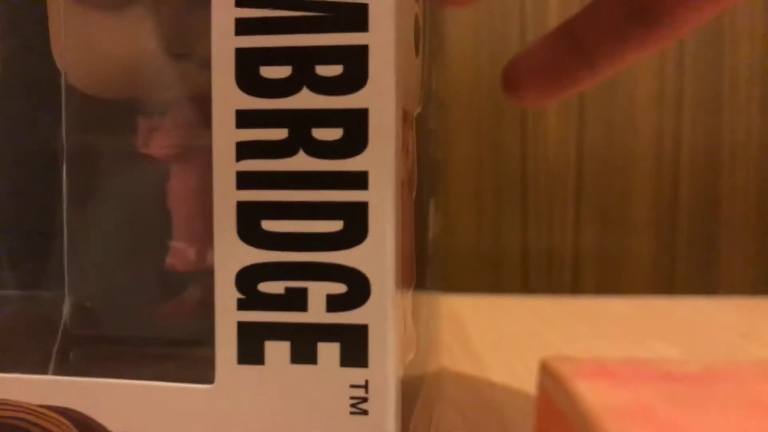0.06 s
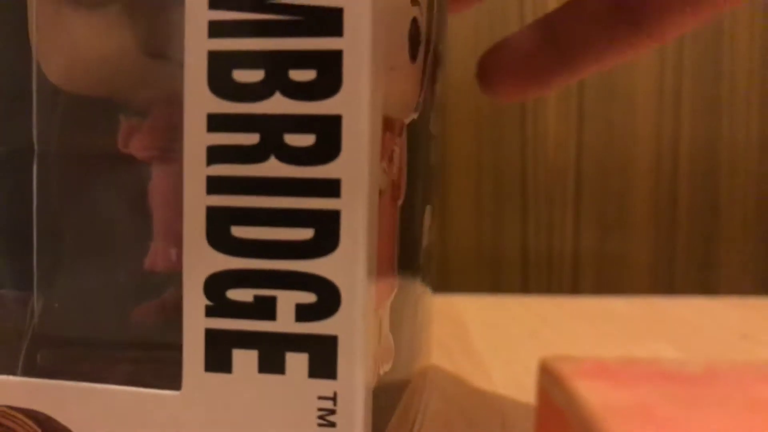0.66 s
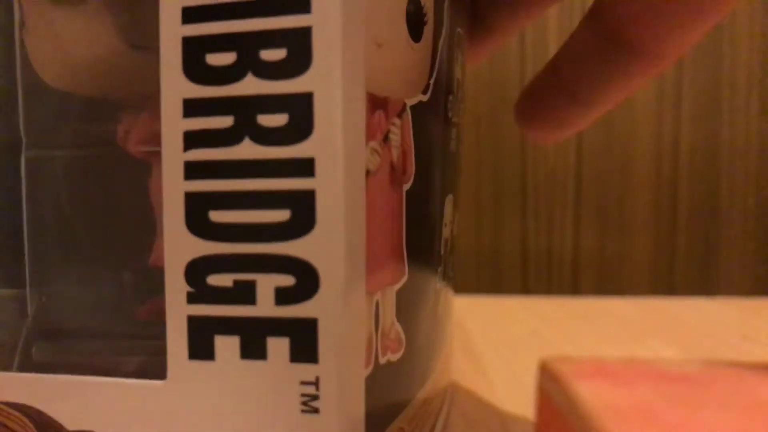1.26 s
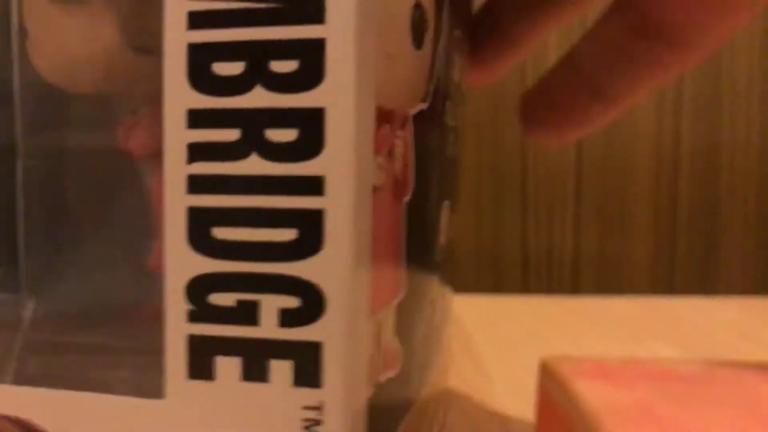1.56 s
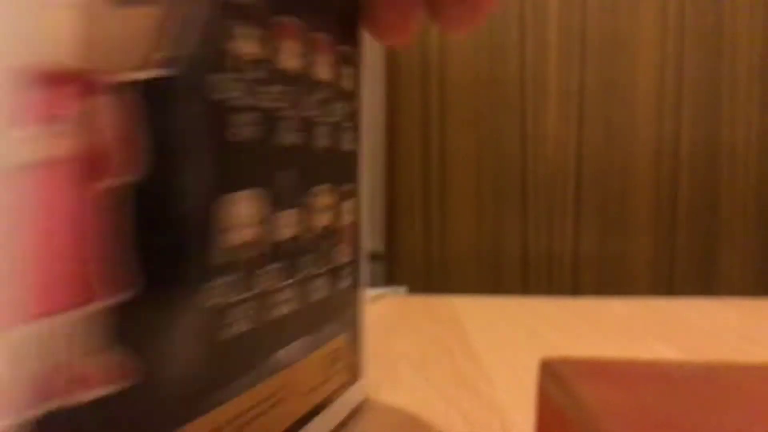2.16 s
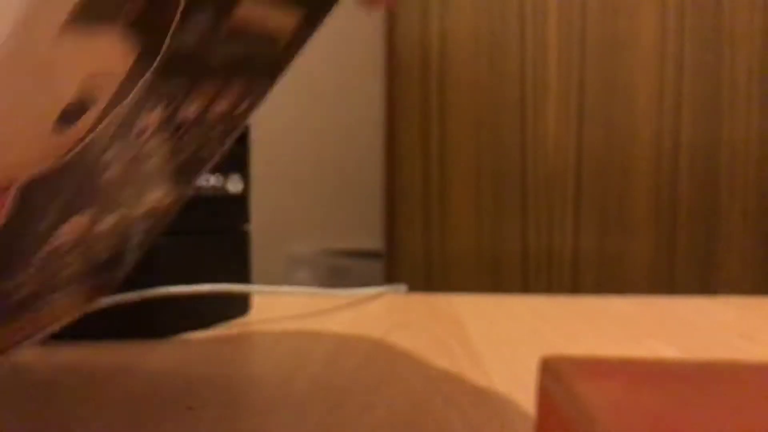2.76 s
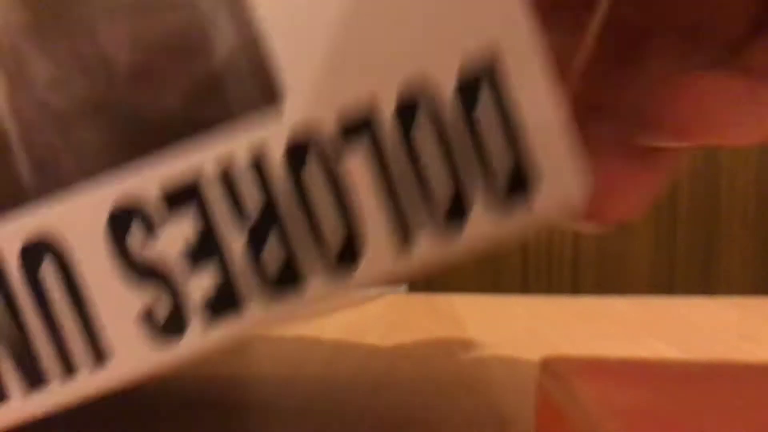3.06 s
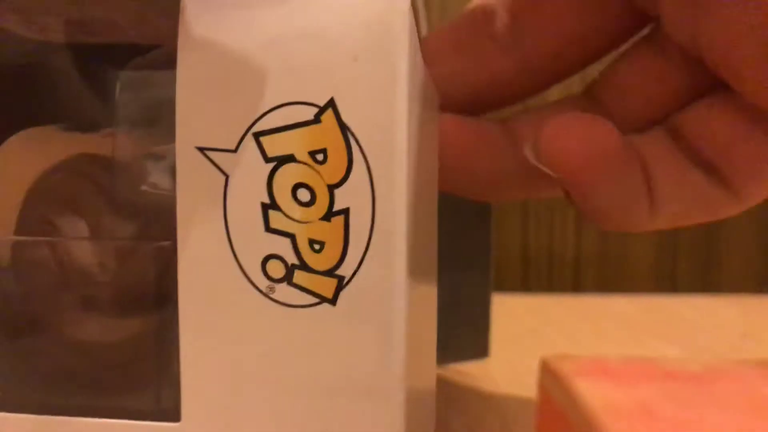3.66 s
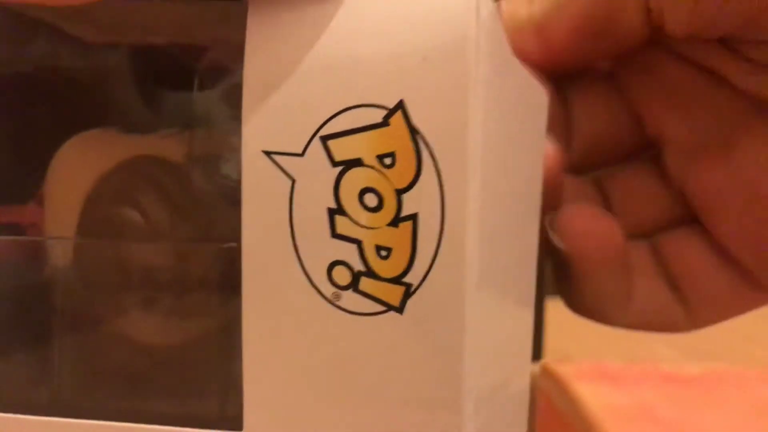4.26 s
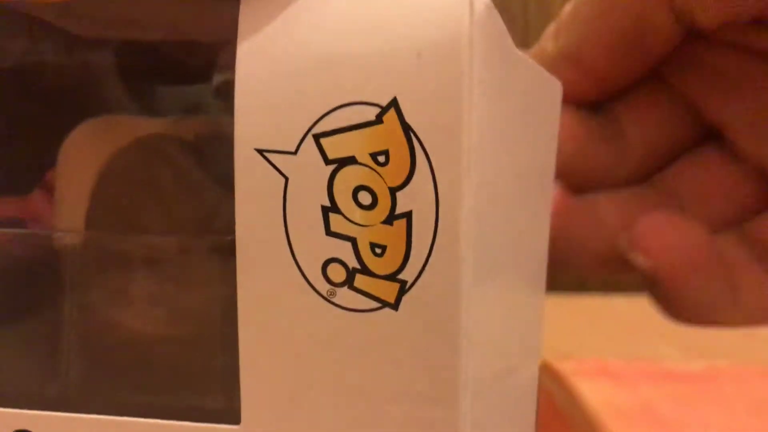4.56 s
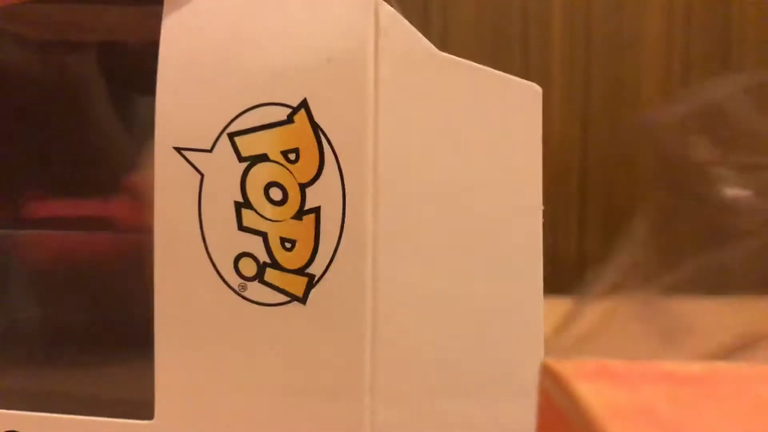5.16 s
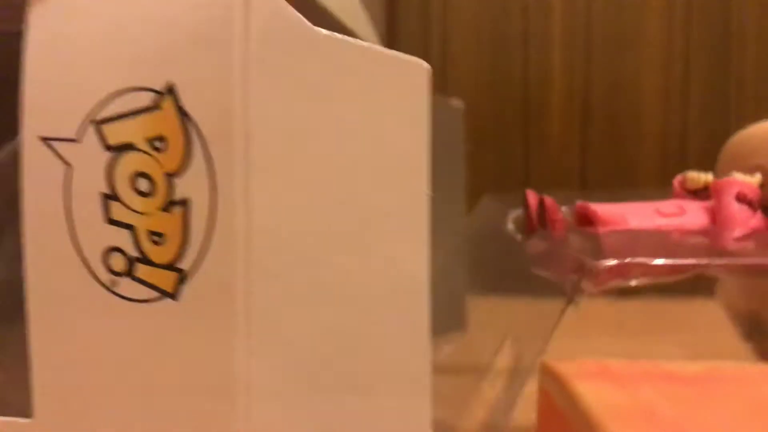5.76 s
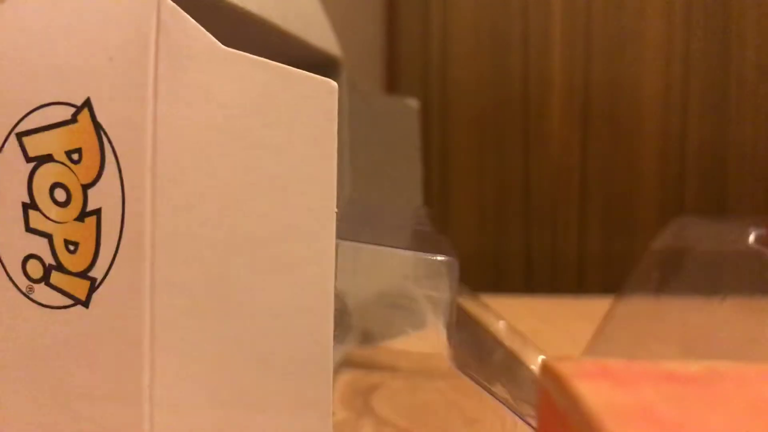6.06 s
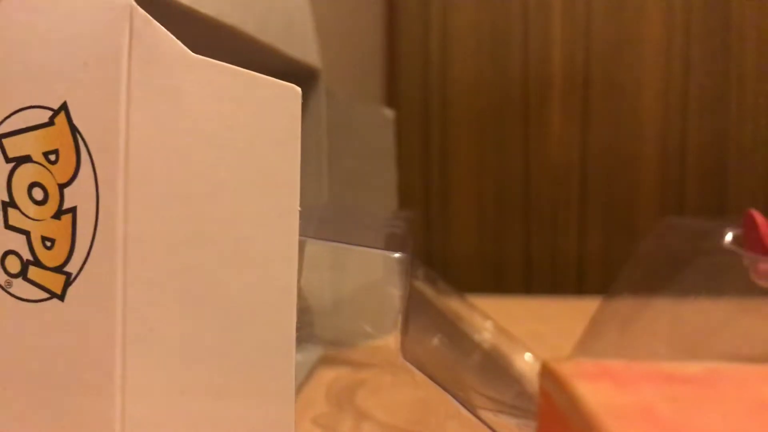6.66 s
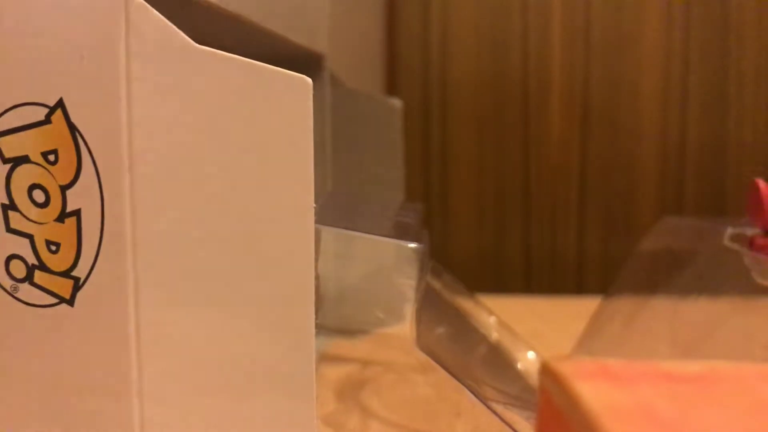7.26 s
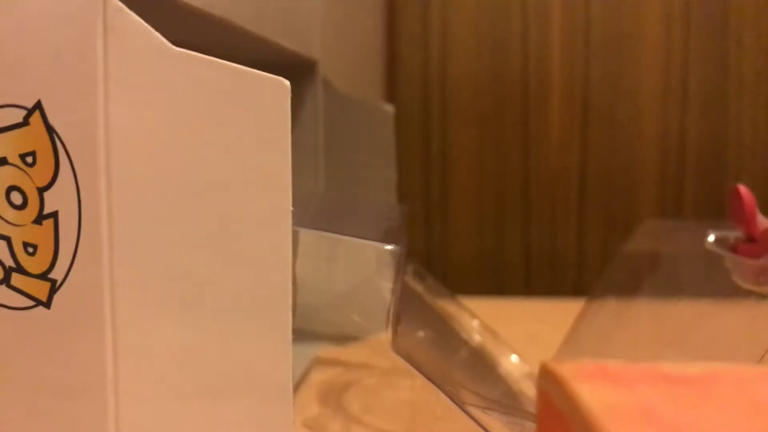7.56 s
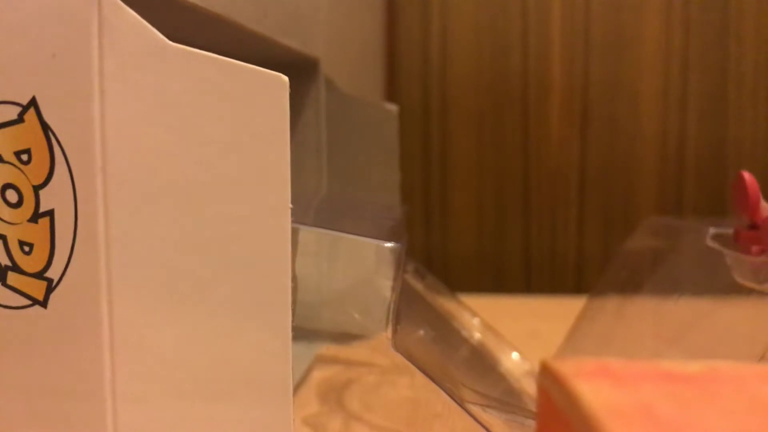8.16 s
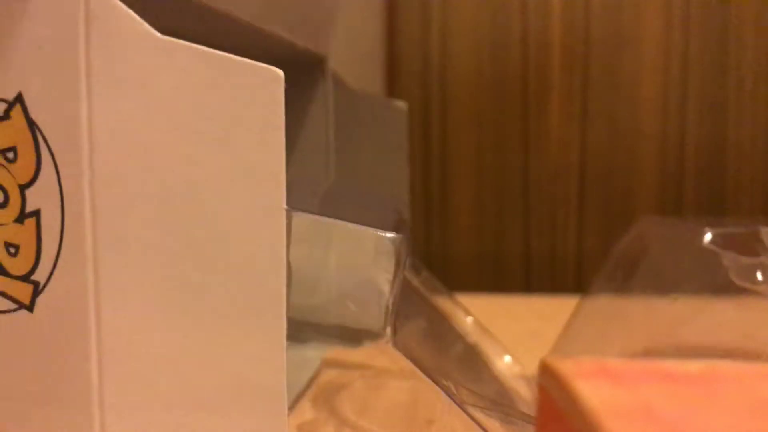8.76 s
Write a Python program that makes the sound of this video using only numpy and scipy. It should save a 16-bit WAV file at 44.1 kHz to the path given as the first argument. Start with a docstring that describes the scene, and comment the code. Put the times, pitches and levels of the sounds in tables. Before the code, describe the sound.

Hands turn and open a thin cardboard toy box and slide out a plastic tray, with hollow knocks, scrapes and crinkles.

```python
"""In a small, quiet room, close to the microphone, hands turn a thin cardboard toy box, pry its flap open
and slide the plastic tray out onto a desk. Knocks, taps and snaps make the box panels ring. Fingers,
flap and tray rub in short strokes, sticking and slipping in tiny grains that shake the same panels.
Now and then the plastic crinkles or pops, flap and tray squeak, and a squeezed wall booms."""
import sys
import numpy as np
from scipy import signal
from scipy.fft import rfft, irfft
from scipy.io import wavfile
from scipy.ndimage import uniform_filter1d, map_coordinates

SR = 44100
rng = np.random.default_rng(int(sys.argv[2]) if len(sys.argv) > 2 else 0)


def pcm_store(signal):
    """Save signal as 16-bit PCM."""
    levels = np.round(np.clip(np.atleast_2d(signal), -1, 1) * 32767)
    wavfile.write(sys.argv[1], SR, levels.astype(np.int16).T)


N = 397341
TOP_HZ = 15900


# knocks and snaps of box, flap and tray: (time [s], contact time [s], panel pitch [Hz],
# thump level [dB], panel level [dB], crack level [dB], tick level [dB])
KNOCKS = [(0.305, 0.0047, 349, -34, -34.5, -41, -49), (0.642, 0.002, 760, -48.5, -40.5, -36, -42.5),
          (1.261, 0.0035, 718, -31.5, -19, -24, -31), (1.415, 0.0015, 434, -35.5, -24.5, -35, -38),
          (1.436, 0.0048, 460, -31, -21, -38, -37.5), (1.865, 0.0041, 506, -24, -24, -24, -34.5),
          (2.886, 0.0047, 424, -25, -33.5, -44.5, -53), (3.549, 0.0051, 1150, -46, -36, -35.5, -51),
          (3.899, 0.00387, 1615, -46, -39, -32.5, -37.5), (4.4, 0.0013, 470, -44.5, -24, -28.5, -31.5),
          (4.577, 0.00504, 540, -72, -26, -35, -42.5), (4.8345, 0.0014, 1370, -33.5, -25.5, -31, -33),
          (4.851, 0.0083, 1380, -46, -27.5, -22, -29.5), (4.862, 0.013, 1540, -24.5, -26, -26, -24.5),
          (4.927, 0.005, 527, -24.5, -31.5, -37, -40.5), (4.967, 0.012, 507, -35.5, -20.5, -32, -37.5),
          (5.137, 0.0071, 550, -27, -31, -32.5, -47), (5.68, 0.0028, 2940, -66, -39.5, -34.5, -43),
          (5.776, 0.0079, 440, -33.5, -37, -38.5, -51.5), (5.883, 0.009, 354, -31, -26.5, -35, -43.5),
          (6.426, 0.0024, 412, -40.5, -37.5, -44, -69), (6.553, 0.0092, 390, -37, -43, -47, -49.5),
          (7.859, 0.0046, 1570, -47, -43, -33.5, -43)]

def knocks():
    """Box, flap and tray bump and snap, each time with its own tone."""
    return place((start, blow(contact_s, ring_hz, levels_db, dense_db=17))
                 for start, contact_s, ring_hz, *levels_db in KNOCKS)


# pitch ranges of thump, panel, crack and tick: (low edge [Hz], high edge [Hz])
BANDS = [(52, 250), (250, 900), (900, 3000), (3000, 16000)]

def blow(contact_s, ring_hz, levels_db, dense_db, slip_db=7, ring_db=5):
    """A touch and eight small slips ring the struck panel, the box and a dense mass of short tones."""
    t = np.arange(SR // 5) / SR
    when = (np.arange(8) + rng.random(8)) / 8
    size = np.tanh(rng.standard_normal(8))
    force = np.zeros(len(t))
    np.add.at(force, (when * contact_s * SR).astype(int), undb(slip_db) * size * np.cos(when))
    force[0] += 1
    panel = undb(ring_db) * np.sin(2 * np.pi * ring_hz * t) * fade(t, ring_time(ring_hz))
    ring = signal.fftconvolve(force, box_ring(t) + panel)[:len(t)]
    # a sharp snap keeps more treble than a soft bump
    corner_hz = np.clip(13000 * undb(1.14 * (levels_db[-1] - levels_db[-2])), 2500, TOP_HZ)
    out = 0
    for (lo, hi), db, t60 in zip(BANDS, levels_db, np.geomspace(0.057, 0.0048, len(BANDS))):
        decay = fade(t, t60) + undb(-19) * fade(t, t60=0.22)  # the tray inside shivers on longer
        power = signal.fftconvolve(force ** 2, decay ** 2)[:len(t)]
        power = np.abs(soften(power, hz=85))  # card gives way, so the blow takes a moment to build
        dense = undb(dense_db) * np.sqrt(power) * rng.standard_normal(len(t))
        part = band(soften(soften(ring + dense, corner_hz), corner_hz), lo, hi)
        first_30ms = part[:int(.03 * SR)]
        out = out + undb(db) * part / np.sqrt(np.mean(first_30ms ** 2))
    return out


# the box's natural tones: (pitch [Hz], level [dB])
BOX_TONES = [(112, -3), (175, -2), (255, -9), (390, 3.5), (522, 8.5), (590, -1.5), (860, -4.5), (1125, 0),
             (1430, 5), (1640, 6)]

def box_ring(t, scatter_db=3.5):
    """The box rings with a different mix of its tones wherever it is touched."""
    hz, db = np.transpose(BOX_TONES)[:, :, None]
    weight, detune, side = rng.standard_normal((3, len(BOX_TONES), 1))
    waves = np.sign(side) * np.sin(2 * np.pi * hz * (1 + 0.033 * detune) * t)
    return np.sum(undb(db + scatter_db * weight) * fade(t, ring_time(hz)) * waves, axis=0)


def ring_time(hz):
    """Seconds a tone takes to fall 60 dB; in card, high tones die sooner."""
    return 0.05 * (hz / 500) ** -0.52


# fingers tapping the card: (time [s], level [dB])
TAPS = [(0.001, -39.5), (0.08, -58), (0.134, -55.5), (0.24, -61), (0.459, -53), (1.131, -39),
        (1.514, -43.5), (1.81, -38.5), (1.824, -40), (1.967, -42.5), (2.235, -39), (2.323, -49),
        (2.408, -40.5), (2.59, -44), (3.234, -44.5), (5.557, -37), (7.483, -48), (7.508, -45.5),
        (8.087, -51.5), (8.207, -54.5), (8.785, -49.5)]

def taps():
    """Soft finger pads land with a hollow bump."""
    return light_blows(TAPS, contact_s=.008, ring_hz=516, bands_db=(-3.5, 2.5, -11.5, -18.5), dense_db=10)


# a nail picking at the card: (time [s], level [dB])
PICKS = [(3.445, -41), (3.619, -43), (3.689, -42), (3.731, -41), (3.787, -45), (3.82, -37), (6.007, -34),
         (7.598, -41)]

def nail_picks():
    """A fingernail catches the card's edge with a click."""
    return light_blows(PICKS, contact_s=.005, ring_hz=1155, bands_db=(-10, 0, -5.5, -19), dense_db=11.5)


# crinkles of the plastic: (time [s], level [dB])
CRINKLES = [(1.009, -55.5), (1.403, -46), (1.437, -31), (1.729, -56), (2.128, -56), (2.237, -53),
            (2.249, -51.5), (2.409, -47.5), (2.502, -58), (2.729, -63), (3.977, -52), (4.06, -52.5),
            (4.292, -45), (4.381, -46), (4.566, -56), (4.676, -54.5), (4.753, -54), (5.311, -49),
            (6.496, -53.5), (6.829, -62), (7.032, -62), (7.152, -52), (7.682, -65.5), (7.909, -52)]

def crinkles():
    """The plastic window and tray give light, bright crackles."""
    return light_blows(CRINKLES, contact_s=.002, ring_hz=510.5, bands_db=(-9, 7, 5, 0), dense_db=16.5)


# pops of the plastic: (time [s], level [dB])
POPS = [(4.522, -32), (5.19, -23.5), (6.485, -42), (6.548, -41), (7.084, -48.5), (7.878, -38)]

def pops():
    """Stiff plastic pops over and rings."""
    return light_blows(POPS, contact_s=.0025, ring_hz=1561, bands_db=(-37, -22.5, -2.5, -17), dense_db=7)


def light_blows(table, contact_s, ring_hz, bands_db, dense_db):
    """Blows of one kind; bands_db is added to each level for thump, panel, crack and tick."""
    return place((start, blow(contact_s, ring_hz, db + np.array(bands_db), dense_db))
                 for start, db in table)


# tone colour of rubbed card: (frequency [Hz], level [dB])
CARD_COLOUR = [(40, -34.5), (65, 6.5), (280, -1), (460, 7), (720, -3), (1400, -6), (3400, -18), (6000, -22),
               (10000, -19), (15500, -40)]

def rubbing():
    """Rubbing bends the box, rings its panels and hisses at the cut edges; a firm slide is brighter."""
    power = pad_rubs() + window_glides() + flap_scrapes() + tray_tugs() + desk_shifts() + grip_creep()
    scrape_db, rasp_db, hiss_db, rumble_db = 10 * np.log10(power)
    friction = colour(slips(scrape_db), CARD_COLOUR)
    ringing = 0
    for hz, db in BOX_TONES:
        resonance = signal.iirpeak(hz, Q=hz * ring_time(hz) * np.pi / np.log(1000), fs=SR)
        grip_db = 4.5 * wander(18)  # the shifting grip frees one tone and muffles another
        ringing = ringing + undb(db + grip_db) * signal.lfilter(*resonance, friction)
    ringing = waver(ringing, depth=.06, rate=14)  # pressure stiffens and slackens the panels
    card = unit(friction) + unit(ringing)
    sizzle = undb(-6 + 0.26 * (hiss_db + 34)) * unit(band(card, 7500, TOP_HZ))
    rumble = undb(rumble_db + 2 * wander(11)) * unit(band(card, *BANDS[0]))
    scrape = undb(scrape_db + 1.5) * unit(band(card, *BANDS[1]))
    rasp = undb(rasp_db) * unit(band(card, 945, 3260))
    hiss = undb(hiss_db) * (unit(band(card, 2400, 6370)) + sizzle)
    return rumble + scrape + rasp + hiss


def slips(scrape_db, rate=1000, steady=0.81, uneven_db=2.3):
    """Surfaces stick and slip in tiny bursts of noise, more often in a firm slide."""
    chance = rate * undb(0.34 * (scrape_db + 42)) / SR
    power = grains(chance, spread_db=3.5, t60=0.02, samples=SR // 20, weight=1 / chance)
    noise = np.sqrt(power / power.mean() + steady) * rng.standard_normal(N)
    return unit(noise * undb(uneven_db * wander(45)))


# strokes of the flap: (start [s], length [s], level [dB])
FLAP_SCRAPES = [(1.365, 0.09, -43), (3.832, 0.07, -41.5), (3.85, 0.011, -28), (4.112, 0.065, -37),
                (4.2, 0.28, -47.5), (4.33, 0.15, -38.5), (4.563, 0.073, -51.5), (4.845, 0.066, -35)]

def flap_scrapes():
    """Power of the flap's cut edge scraping brightly in its slot."""
    return rub_bands(strokes(FLAP_SCRAPES), rasp_db=0, hiss_db=-3.5, rumble_db=-13)


# pulls on the tray: (start [s], length [s], level [dB])
TRAY_TUGS = [(4.97, 0.37, -41.5), (5.09, 0.048, -34.5), (5.24, 0.27, -44.5), (5.68, 0.077, -47),
             (5.76, 0.24, -44.5), (5.84, 0.03, -36.5), (5.965, 0.051, -36)]

def tray_tugs():
    """Power of the tray dragging out of the box."""
    return rub_bands(strokes(TRAY_TUGS), rasp_db=-2, hiss_db=-11, rumble_db=-3)


# finger strokes on the card: (start [s], length [s], level [dB])
PAD_RUBS = [(1.03, 0.44, -48), (1.45, 0.093, -43.5), (1.865, 0.041, -35.5), (2.885, 0.06, -37.5),
            (3.55, 0.097, -45.5), (6.553, 0.026, -43.5), (7.46, 0.073, -42), (7.58, 0.048, -44.5),
            (7.812, 0.12, -50.5)]

def pad_rubs():
    """Power of finger pads easing into a dull drag over the card."""
    return rub_bands(strokes(PAD_RUBS, attack_s=0.014), rasp_db=-6.5, hiss_db=-19.5, rumble_db=-0.92)


# finger strokes on the window: (start [s], length [s], level [dB])
GLIDES = [(1.27, 0.14, -47.5), (2.405, 0.12, -52), (2.88, 0.6, -49), (3.05, .12, -43.5), (8.7, 0.37, -60.5)]

def window_glides():
    """Power of fingers hissing over the smooth plastic window."""
    return rub_bands(strokes(GLIDES, attack_s=0.014), rasp_db=-4.5, hiss_db=-5, rumble_db=-5)


# moves of the tray on the desk: (start [s], length [s], level [dB])
DESK_SHIFTS = [(6.23, 0.031, -53), (8.295, 0.11, -45), (8.545, 0.14, -46)]

def desk_shifts():
    """Power of the smooth tray sliding on the desk."""
    return rub_bands(strokes(DESK_SHIFTS, attack_s=0.014), rasp_db=-1.55, hiss_db=-15, rumble_db=-5.5)


# squeaks and groans: (start [s], length [s], pitch [Hz], level [dB])
SQUEAKS = [(3.86, 0.015, 1110, -29), (3.86, 0.053, 2830, -45), (4.962, 0.024, 517, -19.5),
           (5.859, 0.053, 590, -34), (6.553, 0.042, 388, -39), (6.57, 0.043, 178, -43)]

def squeaks(rough=0.045, ring_cycles=35):
    """Sticking and slipping locks onto one tone of flap or tray, which sings unsteadily and rings out."""
    out = 0
    for start, length, hz, db in SQUEAKS:
        t = np.maximum(np.arange(N) / SR - start, 0)
        swell = np.minimum(4 * t / length, 1) * fade(np.maximum(t - length, 0), ring_cycles / hz)
        pitch = hz * (1 + rough * wander(hz / 2))
        tone = np.sin(2 * np.pi * np.cumsum(pitch) / SR)
        out = out + undb(db) * swell * unit(tone)
    return out


# squeezes of the box: (start [s], length [s], level [dB])
SQUEEZES = [(0.58, 0.033, -46.5), (1.47, 0.039, -35), (1.71, 0.12, -39), (3.63, 0.039, -43)]

def booms():
    """A squeeze bends a whole wall, which booms low."""
    return np.sqrt(strokes(SQUEEZES)) * unit(band(rng.standard_normal(N), 52.6, 84.5))


def fibres(per_second=170, tick_db=-5.5, tray_db=-12):
    """Single fibres catch on the flap's edge and the sliding tray, and let go with tiny dry ticks."""
    power = grains(per_second / SR, spread_db=4.5, t60=0.004, samples=SR // 50)
    ticks = soften(np.sqrt(power) * rng.standard_normal(N), hz=5000)
    drag = np.sqrt(strokes(FLAP_SCRAPES)) + undb(tray_db) * np.sqrt(strokes(TRAY_TUGS))
    return undb(tick_db) * drag * unit(band(ticks, BANDS[2][0], TOP_HZ))


# faint rubbing of the holding hand: (time [s], level [dB])
GRIP_CREEP = [(0, -50.5), (.25, -62.5), (.95, -58), (1.6, -49), (2.05, -56.5), (2.3, -50), (2.8, -59),
              (3.2, -60), (4.03, -60.5), (4.5, -49.5), (5.65, -48), (6.15, -64.5), (6.4, -55),
              (6.75, -66.5), (9, -65.5)]

def grip_creep():
    """Power of the holding hand, which creeps over the card all the time."""
    return rub_bands(undb(curve(GRIP_CREEP)) ** 2, rasp_db=-6.5, hiss_db=-14, rumble_db=0.47)


def creaks(count=150, creak_db=-3):
    """The held box gives under the fingers in little jerks, each a hollow ring of its panels."""
    gain = undb(curve(GRIP_CREEP) + creak_db)
    t = np.arange(SR // 10) / SR
    return place((i / SR, rng.random() * gain[i] * unit(band(box_ring(t), *BANDS[1])))
                 for i in rng.integers(N, size=count))


def bending(x, depth_db=2.2, full_hz=1800):
    """Bent card and plastic keep changing their upper tones: patches of treble swell and fade."""
    hz, _, frames = signal.stft(x, SR, nperseg=1024)
    patches = rng.standard_normal(frames.shape)
    for _ in range(2):
        patches = uniform_filter1d(patches, size=12, axis=0)  # smooth across pitch
        patches = uniform_filter1d(patches, size=4, axis=1)  # and across time
    gain = undb(depth_db * unit(patches) * np.minimum(hz / full_hz, 1)[:, None])
    gain = gain / np.sqrt(np.mean(gain ** 2, axis=1, keepdims=True))
    return signal.istft(frames * gain, SR)[1][:N]


def room(x, echo_db=-14, low_t60=0.16, high_t60=0.088, build_s=0.009):
    """The small room adds a short echo that dulls as it dies."""
    t = np.arange(SR // 3) / SR
    tail = sum(band(rng.standard_normal(len(t)), lo, hi) * fade(t, t60)
               for (lo, hi), t60 in zip(BANDS, np.geomspace(low_t60, high_t60, len(BANDS))))
    tail = tail * np.minimum(t / build_s, 1) ** 2
    return x + undb(echo_db) * signal.fftconvolve(x, tail / np.linalg.norm(tail))[:N]


# tone colour of the quiet room: (frequency [Hz], level [dB])
HUSH_COLOUR = [(25, -3.5), (70, 14), (520, -10), (2300, -18.5), (6200, -15.5), (15000, -28.5)]

def room_hush(level_db=-63):
    """The room's faint, steady noise."""
    return undb(level_db) * unit(colour(rng.standard_normal(N), HUSH_COLOUR))


def strokes(table, attack_s=0.012, sag_db_per_s=3.5, release_t60=0.22):
    """Power of strokes that swell, sag a little, then die away."""
    power = np.zeros(N)
    for start, length, db in table:
        t = np.maximum(np.arange(N) / SR - start, 0)
        swell = np.minimum(t / attack_s, 1)
        release = fade(np.maximum(t - length, 0), release_t60)
        power += (swell * undb(db - sag_db_per_s * t) * release) ** 2
    return power


def rub_bands(power, rasp_db, hiss_db, rumble_db):
    """Four rows of power: the scrape itself, then rasp, hiss and rumble relative to it."""
    return power * undb([0, rasp_db, hiss_db, rumble_db])[:, None] ** 2


def grains(chance, spread_db, t60, samples, weight=1):
    """Power of tiny fading bursts, random in time and size."""
    size = undb(spread_db * np.minimum(rng.exponential(size=N), 3))
    energy = weight * size ** 2 * (rng.random(N) < chance)
    return np.abs(signal.fftconvolve(energy, fade(np.arange(samples) / SR, t60) ** 2)[:N])


def place(events):
    """Add up (time [s], sound) pairs on one track."""
    out = np.zeros(N + SR)
    for start, sound in events:
        i = int(start * SR)
        out[i:i + len(sound)] += sound
    return out[:N]


def undb(db):
    """Decibels to gain."""
    return 10 ** (np.asarray(db) / 20)


def unit(x):
    """Scale to an average power of 1."""
    return x / np.sqrt(np.mean(x ** 2) + 1e-18)


def band(x, lo, hi):
    """Keep what lies between lo and hi Hz."""
    return signal.sosfilt(signal.butter(4, [lo, hi], "band", fs=SR, output="sos"), x)


def soften(x, hz):
    """Gently turn down what lies above hz."""
    g = np.tan(np.pi * hz / SR)
    return signal.lfilter([g, g], [g + 1, g - 1], x)


def colour(x, points):
    """Shape the tone with (frequency [Hz], level [dB]) points."""
    hz, db = np.transpose(points)
    f = np.maximum(np.arange(N // 2 + 1) * SR / N, 1)
    return irfft(rfft(x) * undb(np.interp(np.log(f), np.log(hz), db)), N)


def fade(t, t60):
    """Die away, 60 dB down after t60 seconds."""
    return np.exp(-np.log(1000) * t / t60)


def wander(rate):
    """Drift to a new random value rate times a second."""
    return unit(np.interp(np.arange(N) / SR * rate, np.arange(N), rng.standard_normal(N)))


def waver(x, depth, rate):
    """Let the pitch drift by a share of itself."""
    return map_coordinates(x, [np.cumsum(1 + depth * wander(rate))], order=1, mode="mirror")


def curve(table):
    """Join (time [s], value) points with straight lines."""
    return np.interp(np.arange(N) / SR, *np.transpose(table))


def scene():
    """The handled box in the room, over a faint hush."""
    hush = room_hush()
    blows = knocks() + taps() + nail_picks() + crinkles() + pops()
    box = blows + creaks() + rubbing() + fibres() + squeaks() + booms()
    return (room(bending(box)) + hush)[None]


# treble colour of the microphone: (frequency [Hz], level [dB])
MIC_COLOUR = [(1800, -1), (8000, -2.5), (10300, -5), (12800, 0.5)]

def record(dry):
    """The microphone colours the treble and the recorder cuts the very top."""
    top_cut = signal.ellip(10, .2, 80, TOP_HZ, fs=SR, output="sos")
    return signal.sosfilt(top_cut, colour(dry, MIC_COLOUR))


dry = scene()
out = record(dry)
pcm_store(out)
```